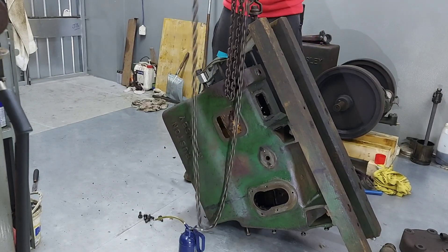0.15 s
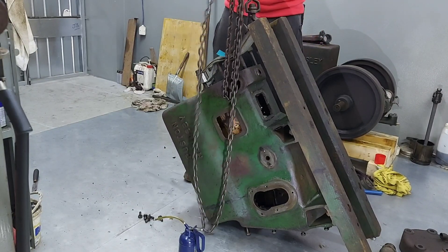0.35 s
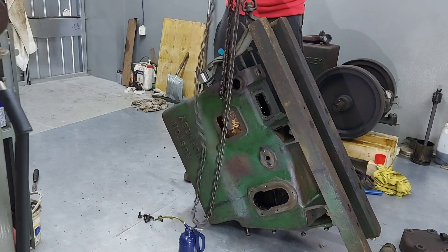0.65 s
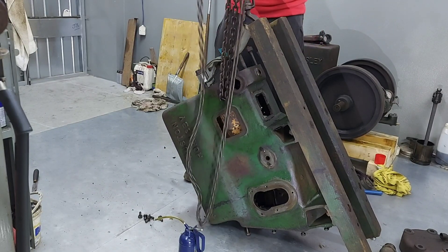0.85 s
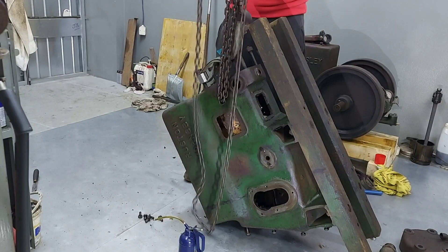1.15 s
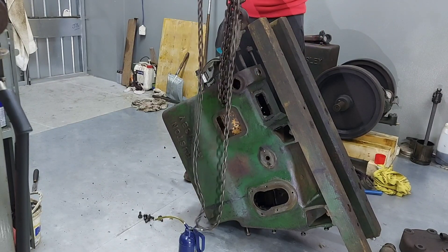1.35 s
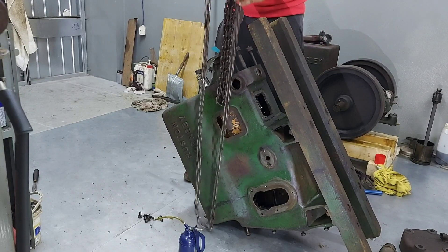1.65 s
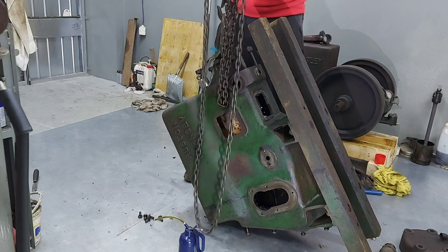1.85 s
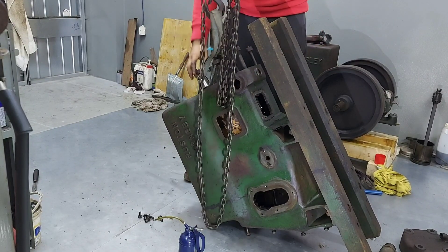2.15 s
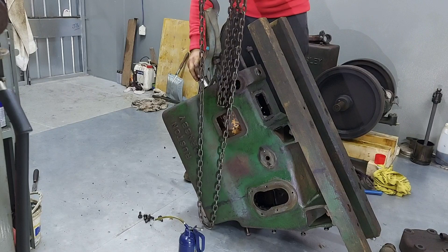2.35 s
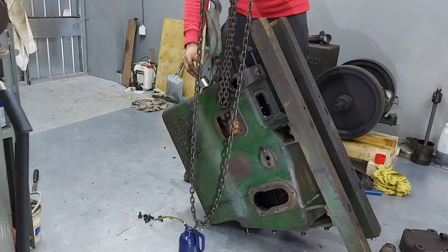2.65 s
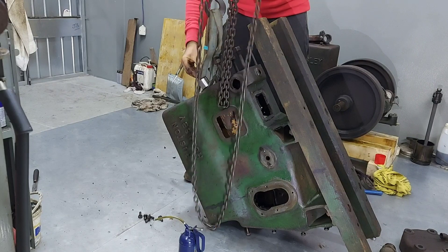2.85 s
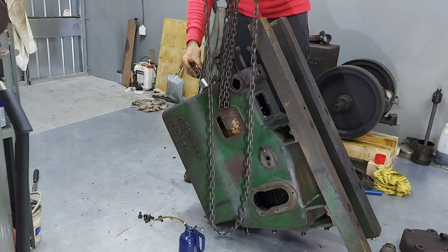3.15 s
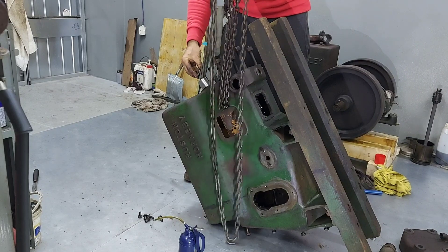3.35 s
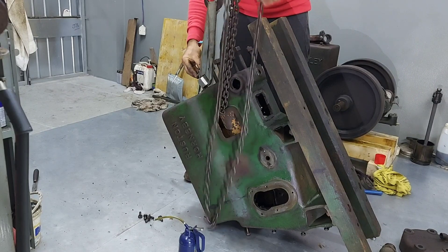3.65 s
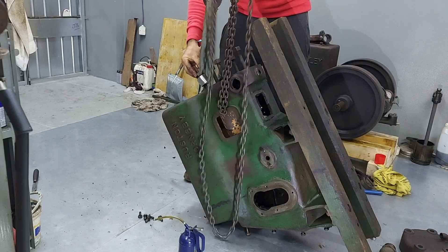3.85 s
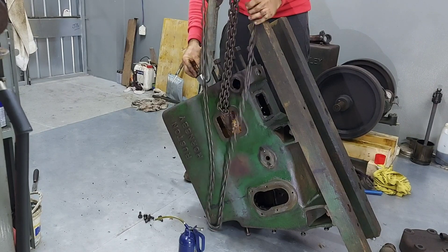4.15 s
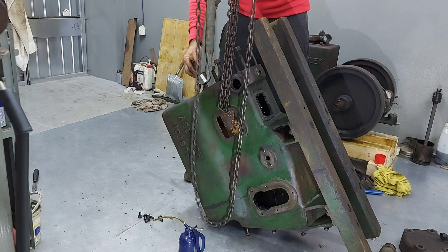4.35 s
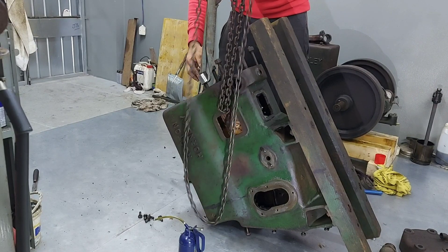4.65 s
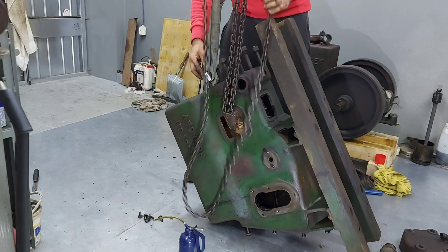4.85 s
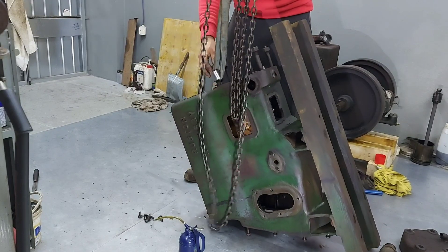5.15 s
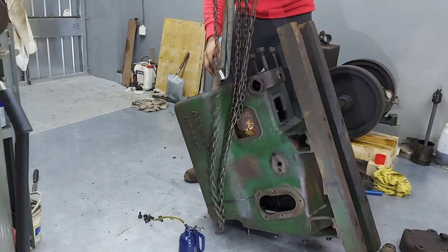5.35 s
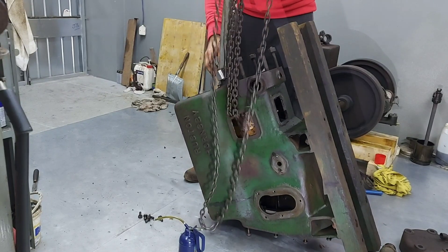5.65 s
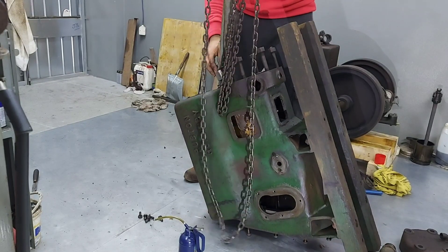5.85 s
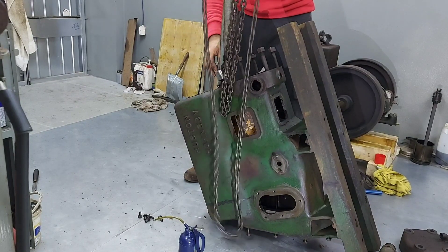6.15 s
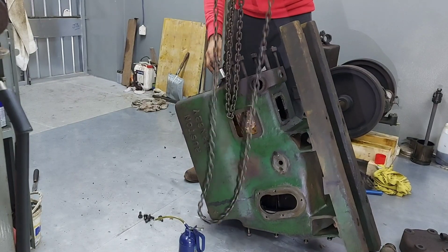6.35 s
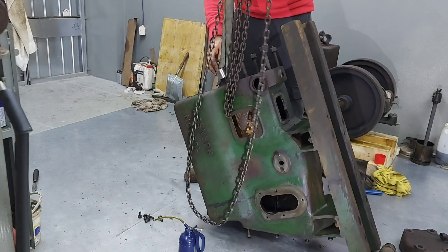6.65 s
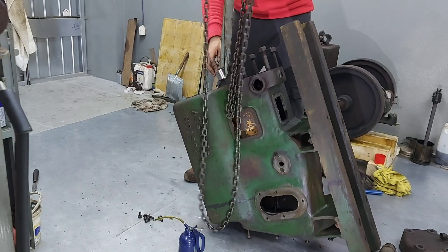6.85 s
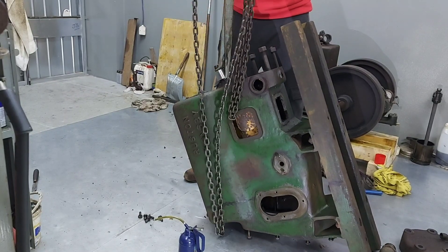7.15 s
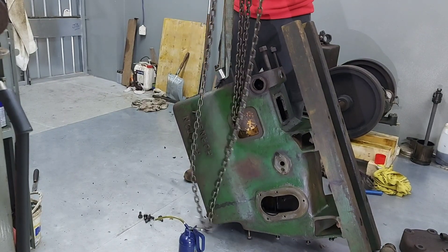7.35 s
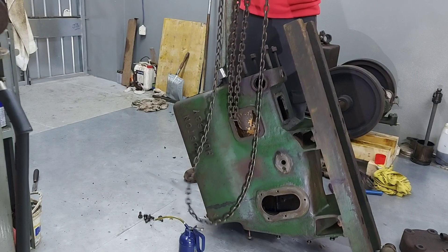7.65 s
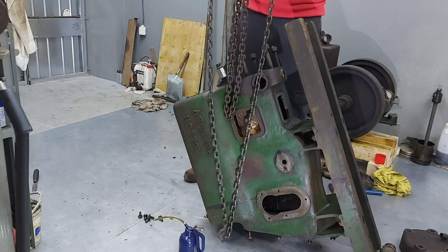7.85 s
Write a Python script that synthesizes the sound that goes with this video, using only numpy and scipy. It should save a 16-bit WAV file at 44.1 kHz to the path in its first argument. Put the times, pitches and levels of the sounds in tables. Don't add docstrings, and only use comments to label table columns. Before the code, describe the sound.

Steel pawl clicks and busy chain rattle fill a hard-walled workshop, leaning heavily left. The loose chain whips against timber with sharp knocks, pauses, then rattles again in a long run. A low thud marks the load touching down and rocking, followed by quick clicks, a bright clang on the iron and a smaller thud. After near quiet, sparse clicks and clinks return. A faint low hum follows each haul.

```python
import sys
import numpy as np
from scipy import signal
from scipy.fft import rfft, irfft, next_fast_len
from scipy.io import wavfile
from scipy.ndimage import uniform_filter1d

SR = 44100
rng = np.random.default_rng(int(sys.argv[2]) if len(sys.argv) > 2 else 0)


def log_audio(samples):
    frames = np.atleast_2d(samples).T
    limited = np.clip(frames, -1, 1)
    pcm = np.round(limited * 32767).astype(np.int16)
    wavfile.write(sys.argv[1], SR, pcm)


def elevation(decibels):
    levels = np.asarray(decibels, float)
    return 10 ** (levels / 20)


N = 353241

# (start_s, peak_db)
LOOP_JERKS = [(0.1666, -9.5), (0.3458, -11.5), (0.7885, -23.5), (1.458, -14), (1.5057, -8), (1.5528, -6),
              (1.6261, -14.5), (1.6913, -7.5), (3.208, -16), (3.4364, -7.5), (3.488, -10), (3.531, -16.5),
              (3.5487, -11.5), (3.651, -10.5), (3.973, -20.5), (5.4282, -12), (5.5343, -22), (6.062, -20.5),
              (6.2021, -18.5)]
# (start_s, peak_db)
PAWL_DROPS = [(0.0483, -19), (0.1132, -12), (0.2862, -16.5), (0.555, -17), (0.6826, -14.5), (.7455, -14.5),
              (.857, -15), (0.9733, -21.5), (1.081, -17), (1.2278, -15), (1.265, -15), (1.314, -18.5),
              (1.3674, -16), (1.44, -17.5), (1.5301, -8), (1.9468, -22), (2.0215, -20.5), (2.166, -18.5),
              (2.844, -29), (2.8725, -21), (2.9666, -18.5), (3.1471, -14.5), (3.2843, -16),
               (3.3623, -15.5), (3.4045, -12), (3.8238, -24.5), (3.8735, -21), (3.927, -18.5),
               (4.0285, -14), (4.344, -19), (4.4143, -17.5), (4.565, -20.5), (4.657, -19), (4.7045, -19),
               (4.742, -18.5), (4.777, -18), (4.8107, -16.5), (4.869, -36.5), (4.9439, -15.5),
               (4.997, -16.5), (5.062, -18.5), (5.1207, -19.5), (5.1484, -18.5), (5.244, -25),
              (5.344, -13), (5.568, -11), (5.652, -14), (5.6994, -14), (5.763, -14), (6.1231, -15.5),
              (6.1646, -16), (6.2346, -16), (6.2707, -14.5), (6.3078, -16), (6.348, -14.5), (6.393, -15.5),
              (6.454, -15.5), (7.0425, -29), (7.4439, -16), (7.5713, -14.5), (7.674, -15), (7.812, -12.5),
              (7.868, -15.5)]
# (pitch_hz, width_hz, level_db)
RATCHET_RING = [(3740, 390, -27.5), (4490, 780, -3), (5650, 1100, -7), (7720, 1460, -4), (9990, 210, -3.5),
                (10550, 440, -1), (14100, 63, -12)]
# (pitch_hz, width_hz, level_db)
PAWL_RING = [(9964, 90, -1), (13580, 130, 0.5)]
# (pitch_hz, width_hz, level_db)
HOUSING_RING = [(415, 23, -8), (1238, 310, -4.5), (1542, 114, 3), (1884, 300, -2), (2556, 380, -2),
                (3284, 470, -5)]
# (pitch_hz, level_db)
WHEEL_COLOUR = [(1000, -24.5), (3000, -34), (8000, 0.5), (12000, -3), (16000, -8)]
# (pitch_hz, level_db)
LOOP_COLOUR = [(530, -3.5), (900, -7), (1460, -2.5), (2890, -7.5), (4010, 0), (7580, 0), (11600, -6.5),
               (15100, -18)]


def pawl():
    start_s, peak_db = np.transpose(LOOP_JERKS + PAWL_DROPS)
    count = len(start_s)
    chance_db = 1
    housing_db, loop_db = chance_db * rng.standard_normal((count, 2)).T
    housing_db = housing_db - 11.5
    is_jerk = np.arange(count) < len(LOOP_JERKS)
    loop_db = loop_db + np.where(is_jerk, -1, -14.5)

    steel = bursts(start_s, peak_db - 5.0, 0.024, 1.0, tap=4.8)
    ratchet = elevation(7.0) * filtered(steel, body(RATCHET_RING))
    wheel = elevation(-1.5) * filtered(steel, tint(WHEEL_COLOUR))

    timber_gain = spells(LOOP_SWINGS)[1][(start_s * SR).astype(int)]
    slapping_db = np.maximum(20 * np.log10(timber_gain + 1e-6) + 33.5, 0)
    tongue_db = peak_db + 0.11 - 0.9 * slapping_db
    tongue = filtered(bursts(start_s, tongue_db, 0.0033, 0.6, tap=28.0), body(PAWL_RING))
    knock_db = peak_db + housing_db - 0.6 * slapping_db
    knock = elevation(12.0) * filtered(bursts(start_s, knock_db, 0.035, 0.54), body(HOUSING_RING))

    def jolt_colour(hz):
        return tint(LOOP_COLOUR)(hz) * (1j * hz / (810 + 1j * hz)) ** 2

    jolt = filtered(bursts(start_s, peak_db + loop_db, 0.038, 0.16), jolt_colour)
    return ratchet + wheel + tongue + knock + jolt


# (start_s, length_s, wheel_links_db, housing_db)
CHAIN_HAULS = [(-.1, 0.21, -17, -23.5), (.12, .2, -23.5, -27), (.33, .17, -21.5, -29.5),
               (.55, .2, -33, -27), (.68, 0.67, -15.5, -23.5), (1.15, 0.47, -31.5, -36.5),
               (1.42, 0.44, -20, -43), (1.72, 0.34, -27, -29.5), (2.0, 0.14, -38, -37),
               (2.25, 0.15, -49, -34), (2.8, .07, -50, -44), (2.86, 0.46, -23, -27),
               (3.2, 0.67, -27.5, -31.5), (3.5, 0.3, -16.5, -33.5), (3.72, 0.23, -23, -32),
               (4.0, 0.43, -22, -31.5), (4.62, 0.44, -32.5, -42.5), (4.78, 0.27, -22, -30),
               (5.0, 0.29, -33, -34.5), (5.4, 0.31, -21, -26.5), (6.06, 0.38, -31.5, -33.5),
               (6.5, 0.16, -54, -28), (6.82, 0.6, -75, -45.5), (7.02, 0.18, -80.5, -35.5),
               (7.4, 0.14, -45.5, -30.5), (7.55, 0.36, -28, -43), (7.62, 0.69, -38.5, -31),
               (7.83, .2, -42, -54)]
# (start_s, length_s, loop_links_db, timber_db)
LOOP_SWINGS = [(.02, 0.28, -22, -54.5), (.33, .14, -23.5, -31), (.53, 0.27, -27.5, -33.5),
               (.8, 0.38, -22.5, -47), (1.15, 0.35, -29.5, -37.5), (1.44, 0.45, -17.5, -21.5),
               (1.8, .2, -32.5, -61), (2.02, .17, -30.5, -34), (2.25, 0.19, -42.5, -37.5),
               (2.865, 0.32, -22.5, -36.5), (3.2, 0.44, -29, -34), (3.35, 0.082, -19, -33.5),
               (3.42, 0.2, -17, -23), (3.59, 0.15, -16.5, -22.5), (3.83, 0.6, -29, -35.5),
               (4.02, 0.29, -19, -26), (4.3, .2, -41, -66), (4.55, 0.26, -41.5, -42),
               (4.73, 0.23, -30, -40), (4.93, 0.21, -31.5, -36.5), (5.15, 0.17, -42, -48),
               (5.33, 0.12, -26, -17), (5.45, 0.26, -23, -38), (6.08, 0.38, -29.5, -43),
               (6.32, 0.24, -32.5, -36), (6.45, 0.29, -43.5, -38), (6.98, 0.23, -56, -39.5),
               (7.3, 0.6, -49.5, -40), (7.6, .2, -53, -35), (7.75, 0.26, -34, -31)]
# (start_s, peak_db)
TIMBER_KNOCKS = [
    (0.163, -24.5),
    (0.398, -37),
    (1.461, -24.5),
    (1.506, -12),
    (3.362, -37),
    (3.435, -19.5),
    (5.325, -19),
    (5.367, -33.5),
    (5.427, -28),
    (7.022, -34.5),
]
# (pitch_hz, width_hz, level_db)
TIMBER_RING = [(336.2, 9.2, 8.5), (457.4, 43.5, 7.5), (502, 203, 2.5), (715, 180, -6.5)]


def chain():
    on_wheel, on_housing = spells(CHAIN_HAULS)
    on_loop, on_timber = spells(LOOP_SWINGS)
    timber = on_timber * elevation(-7.0) * unit(filtered(contacts(150, 0.52, 0.013), body(TIMBER_RING)))
    housing = on_housing * elevation(-3.5) * unit(filtered(contacts(500, 6.2, 0.017), body(HOUSING_RING)))
    loop = on_loop * elevation(-1.91) * unit(filtered(contacts(500, 0.83, 0.012), tint(LOOP_COLOUR)))
    links = contacts(450, 3, 0.005)
    ring = unit(filtered(links, body(RATCHET_RING)))
    rattle = 0.87 * unit(filtered(links, tint(WHEEL_COLOUR)))
    wheel = on_wheel * elevation(-5.5) * (ring + rattle)
    knocks = elevation(19) * filtered(bursts(*np.transpose(TIMBER_KNOCKS), 0.06, 0.26), body(TIMBER_RING))
    return timber + housing + loop + knocks + wheel


# (start_s, peak_db)
LINK_TICKS = [(2.3048, -15), (2.5248, -38), (2.77, -39.5), (2.791, -32.5), (2.842, -30), (5.3157, -16.5),
              (6.947, -46), (6.98, -37), (7.0324, -45), (7.0239, -21.5), (7.389, -41), (7.4212, -29.5)]


def ticks():
    return elevation(-4.5) * filtered(bursts(*np.transpose(LINK_TICKS), 0.014, 0.17), tint(LOOP_COLOUR))


# (start_s, peak_db, softness_db per octave)
IRON_STRIKES = [(0.342, -32.5, -7.5), (1.899, -22, 2), (2.302, -28, -3.5), (5.25, -28.5, -2),
                (6.425, -12, -1.3), (6.452, -15, 0.5), (6.746, -30.5, 0), (7.065, -26.5, 0),
                (7.129, -28, 0), (7.793, -18.5, -0.8), (7.87, -23.5, -2.5)]
# (pitch_hz, level_db, time to fall 60 dB t60_s)
IRON_NOTES = [(561, -13.5, 0.85), (754.6, -12, 1), (1162, -5, 0.29), (1278, -6.5, 0.78), (1374, -3.5, 0.73),
              (1770, 2.5, 0.48), (2170, -7, 0.43), (2610, -7, 0.31), (2620, -18, 0.25), (3160, -9, 0.4),
              (3360, -19.5, 0.1), (3900, -9, 0.31), (3960, -6.5, .15), (1023, -8, 0.4)]
# (start_s, level_db, pitch_hz, t60_s)
LINK_CHINK = [
    (5.252, -36, 3160, 0.17),
    (5.252, -33, 3800, .15),
]


def casting():
    out, t = np.zeros(N + SR), np.arange(SR) / SR
    for start_s, peak_db, soft_db in IRON_STRIKES:
        first = round(start_s * SR)
        for hz, level_db, t60_s in IRON_NOTES:
            drift = np.cumsum(rng.standard_normal(SR)) * 0.012
            dulled_db = soft_db * np.log2(hz / 1500)
            size_db = peak_db - 8.0 + level_db - dulled_db + rng.normal(0, 1)
            gain = elevation(size_db - 60 * t / t60_s) * (1 - np.exp(-t / 0.0037))
            out[first:first + SR] += gain * np.sin(2 * np.pi * hz * t + drift)
    for start_s, level_db, hz, t60_s in LINK_CHINK:
        first = round(start_s * SR)
        out[first:first + SR] += elevation(level_db - 60 * t / t60_s) * np.sin(2 * np.pi * hz * t)

    start_s, peak_db, soft_db = np.transpose(IRON_STRIKES)
    crack = bursts(start_s, peak_db + 4 - 2.9 * soft_db, 0.046, 0.69, tap=0)
    return out[:N], filtered(crack, body([(1500, 1800, -2.8), (3600, 2400, -2.3)]))


# (start_s, level_db, pitch_hz, t60_s)
LOAD_THUDS = [
    (5.36, -36, 114, 1),
    (5.34, -34, 140, 0.36),
    (6.54, -40, 99, 0.81),
]


def thuds():
    t = np.arange(N) / SR
    gain, rocking_hz = rocking()
    out = gain * np.sin(2 * np.pi * np.cumsum(rocking_hz) / SR)
    for start_s, level_db, hz, t60_s in LOAD_THUDS:
        since = np.maximum(t - start_s, 0)
        fade = elevation(level_db - 60 * since / t60_s) * (1 - np.exp(-since / 0.0088))
        out += fade * np.sin(2 * np.pi * hz * since)
    return out


# (start_s, level_db, pitch_hz, t60_s)
LOAD_ROCKING = [
    (5.335, -32, 67.8, 3),
    (5.4, -19, 67.7, 0.39),
    (5.485, -27, 67.7, 1.1),
    (5.67, -33.5, 69.4, 1),
    (6.03, -43.5, 70.4, 2.2),
    (6.545, -31, 70.4, 0.36),
    (6.66, -33, 70, 0.37),
    (6.8, -47, 74, 0.78),
    (6.97, -54, 76, 0.97),
    (7.12, -57, 68, 2.5),
]


def rocking():
    t = np.arange(N) / SR
    columns = np.transpose(LOAD_ROCKING)
    latest = np.maximum(np.searchsorted(columns[0], t) - 1, 0)
    start_s, level_db, hz, t60_s = columns[:, latest]
    since, rise_s = np.maximum(t - start_s, 0), 0.012
    gain = elevation(level_db - 60 * since / t60_s) * (1 - np.exp(-since / rise_s))
    return uniform_filter1d(gain, size=400), hz


# (pitch_hz, level_db)
BEAM_COLOUR = [(25, -20.5), (59, -1.5), (171, 4.5), (211, -10.5), (257, 1), (300, -4), (390, -43),
               (660, -120)]


def beam():
    lag_s = 0.078
    keep = np.exp(-1 / (lag_s * SR))
    turning = np.abs(signal.lfilter([1 - keep], [1, -keep], spells(CHAIN_HAULS)[0])) ** 0.84
    gain = elevation(-35.5) * turning + elevation(-19) * rocking()[0] + elevation(-79)
    return gain * unit(pair(filtered(rng.standard_normal((2, N)), tint(BEAM_COLOUR))))


# (pitch_hz, t60_s)
ROOM_DECAY = [(100, 0.92), (800, 0.79), (2100, 0.67), (5500, 0.6), (14600, 0.26)]


def shop(x, still):
    lead, places, delay = SR // 4, 10, 180
    x = np.concatenate([x[lead:0:-1] * 0.38, x])
    hz, t, z = signal.stft(rng.standard_normal((places, 2, SR)), SR, nperseg=256)
    t60_s = along(ROOM_DECAY, hz)[:, None]
    fading = z * elevation(-60 * t / t60_s) / np.sqrt(t60_s)
    tails = signal.istft(fading, SR, nperseg=256)[1]
    tails = tails / np.linalg.norm(tails, axis=-1, keepdims=True)
    place = np.arange(len(x)) // 600 % places
    m = next_fast_len(len(x) + 2 * SR)
    wet = sum(rfft(x * (place == k), m) * rfft(tails[k], m) for k in range(places))
    wet += rfft(np.pad(still, (lead, 0)), m) * rfft(tails[0], m)
    first = lead - delay
    return pair(irfft(wet, m)[:, first:first + N])


# (pitch_hz, likeness from -1 to 1)
LEFT_RIGHT_LIKENESS = [(60, 0.66), (180, 0.95), (550, 0.51), (1650, 0.23), (4970, -0.033), (15000, -0.23)]


def pair(two):
    def split(hz):
        angle = np.arccos(np.clip(along(LEFT_RIGHT_LIKENESS, hz), -1, 1)) / 2
        return np.array([np.cos(angle), np.sin(angle)])

    mid, side = filtered(two, split)
    return np.array([mid + side, mid - side])


def bursts(times_s, levels_db, length_s, rebound, tap=3):
    out, t = np.zeros(N + SR), np.arange(SR // 15) / SR
    for start_s, level_db in zip(times_s, levels_db):
        late = np.maximum(t - rng.uniform(0.0055, 0.0098), 0)
        again = rebound * (late > 0) * elevation(-60 * late / length_s)
        fade = elevation(-60 * t / length_s) + again
        hit = fade * rng.standard_normal(len(t)) + tap * (t == 0)
        out[round(start_s * SR):][:len(t)] += elevation(level_db) * hit
    return out[:N]


def contacts(rate_hz, spread_db, length_s):
    size = np.minimum(rng.exponential(size=N), 3)
    taps = (rng.random(N) < rate_hz / SR) * elevation(spread_db * size)
    fade = elevation(-60 * np.arange(SR // 20) / SR / length_s)
    return signal.fftconvolve(taps, fade)[:N] * rng.standard_normal(N)


def spells(rows):
    start_s, length_s, *levels_db = np.transpose(rows)[..., None]
    t = np.arange(0, N, 64) / SR
    progress = np.clip((t - start_s) / length_s, 0, 1)
    swell = np.abs(np.sin(np.pi * progress ** 0.74)) ** 1.054
    gains = [np.linalg.norm(elevation(db) * swell, axis=0) for db in levels_db]
    return [np.interp(np.arange(N) / SR, t, gain) for gain in gains]


def body(modes):
    def response(f):
        total = 0
        for k, (hz, width, db) in enumerate(modes):
            total = total + (-1) ** k * elevation(db) * 1j * f * width / (hz * hz - f * f + 1j * f * width)
        return total
    return response


def tint(spectrum):
    return lambda f: elevation(along(spectrum, f))


def filtered(x, response):
    m = next_fast_len(x.shape[-1] + SR // 2)
    return irfft(rfft(x, m) * response(np.fft.rfftfreq(m, 1 / SR)), m)[..., :x.shape[-1]]


def along(points, hz):
    f, v = np.transpose(points)
    return np.interp(np.log(hz + 1), np.log(f + 1), v)


def unit(x):
    return x / np.sqrt(np.mean(x ** 2) + 1e-20)


def scene():
    clicks, links = pawl() + ticks(), chain()
    iron, crack = casting()
    near = elevation(-0.33) * clicks + elevation(-7.0) * links + elevation(-2.5) * iron + elevation(-15) * crack
    far = elevation(3.5) * clicks + elevation(-1.5) * links + elevation(-1.5) * crack
    direct = np.array([near, elevation(-4) * np.roll(near, shift=13)])
    room = shop(far, elevation(-10.5) * iron)
    noise = rng.standard_normal((2, N))
    hush = elevation(-70.0) * unit(filtered(noise, lambda f: 1 / (1 + (f / 1500) ** 2)))
    small = lambda f: (1j * f / 230 / (1 + 1j * f / 230)) ** 3
    return filtered(direct + room + hush, small) + thuds() + beam()


def roll_off(x):
    return signal.sosfilt(signal.butter(12, 17010, fs=SR, output="sos"), x)


# (pitch_hz, left_over_right_db)
LEFT_OVER_RIGHT = [(60, 12), (150, 15), (380, 12), (950, 9.5), (2380, 11.0), (5980, 7.5), (15000, 12.0)]


def record(dry):
    ports = lambda f: elevation(3 + np.array([0 * f, -along(LEFT_OVER_RIGHT, f)]))
    x = filtered(dry, ports)
    rounded = x / (1 + np.abs(x / 0.9) ** 6) ** (1 / 6)
    top_hz = 15800
    mix = filtered(rounded, lambda f: np.clip((top_hz + 150 - f) / 300, 0, 1) ** 2)
    return roll_off(mix)


dry = scene()
out = record(dry)
log_audio(out)
```